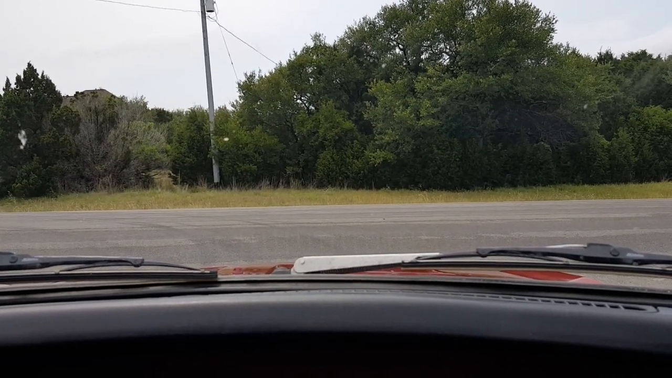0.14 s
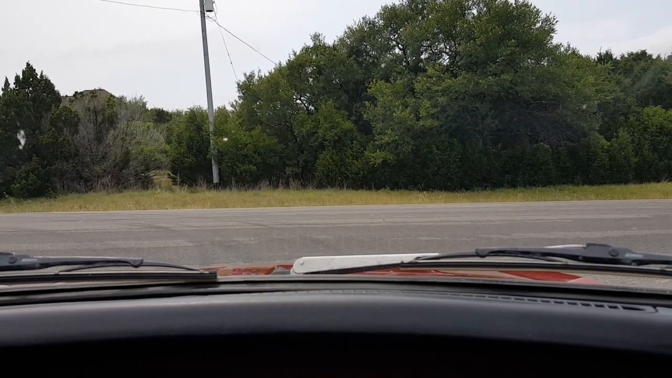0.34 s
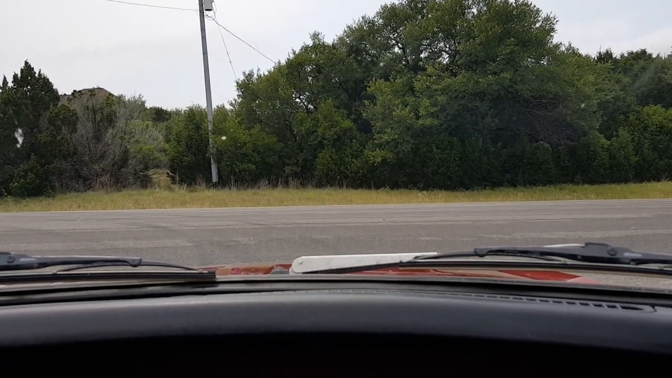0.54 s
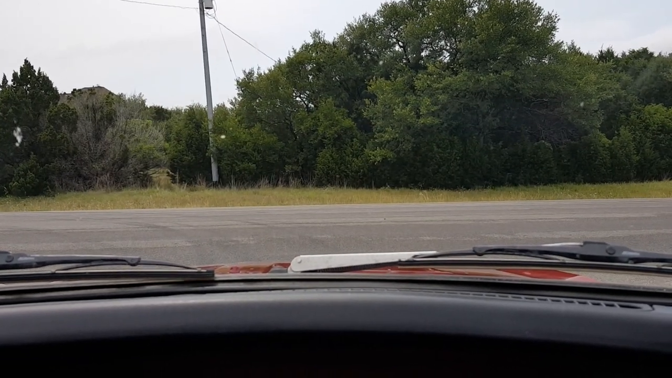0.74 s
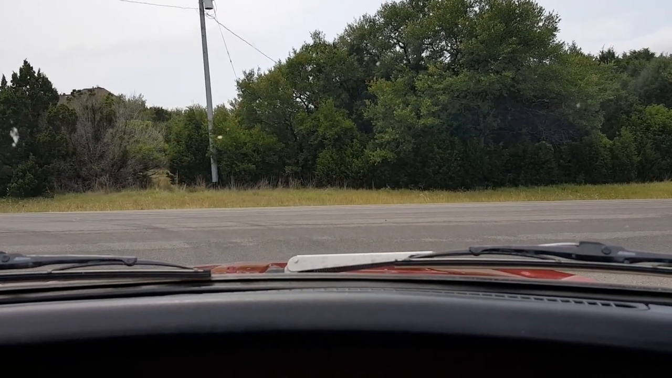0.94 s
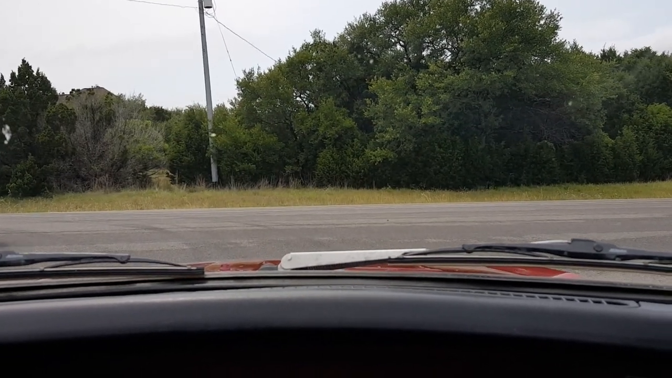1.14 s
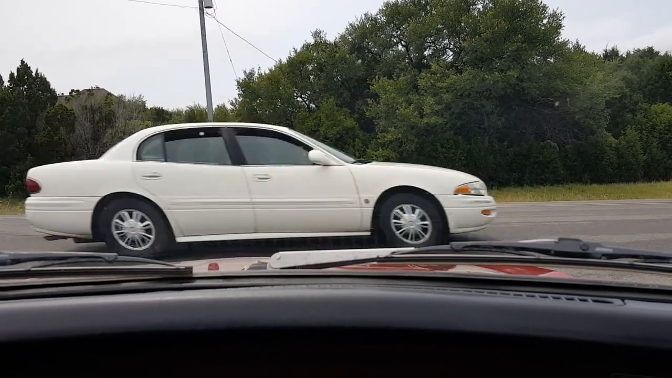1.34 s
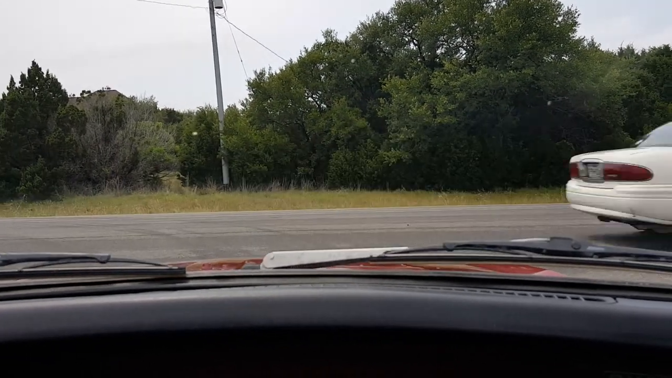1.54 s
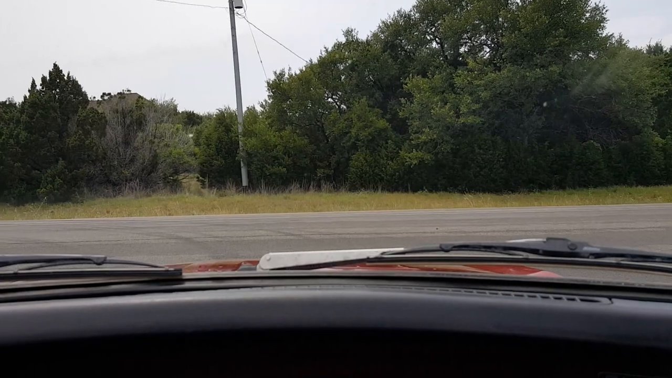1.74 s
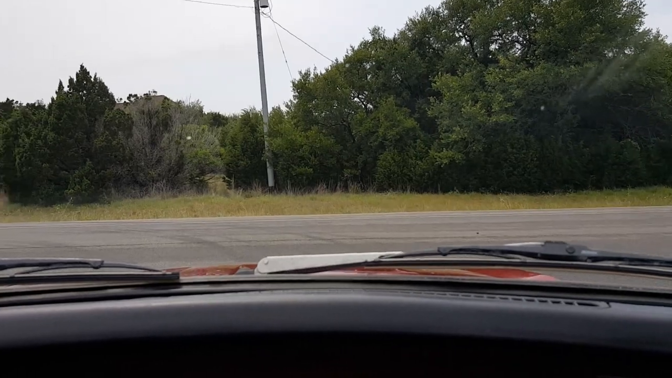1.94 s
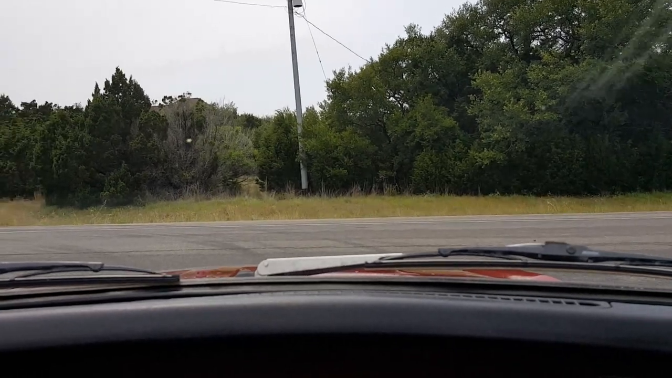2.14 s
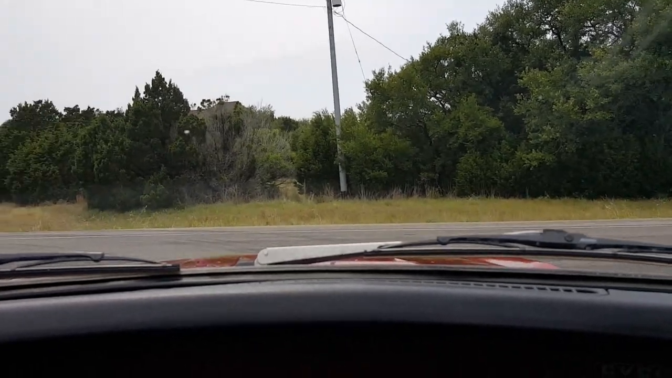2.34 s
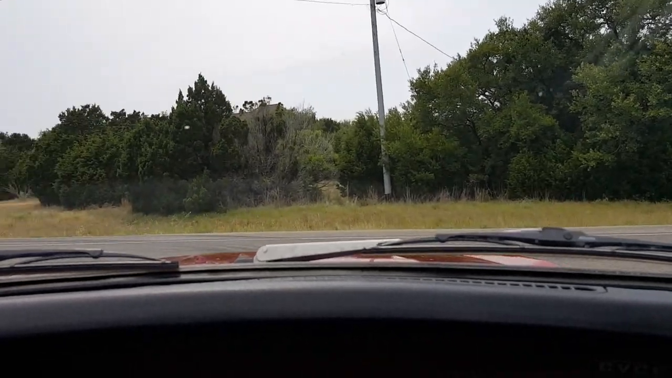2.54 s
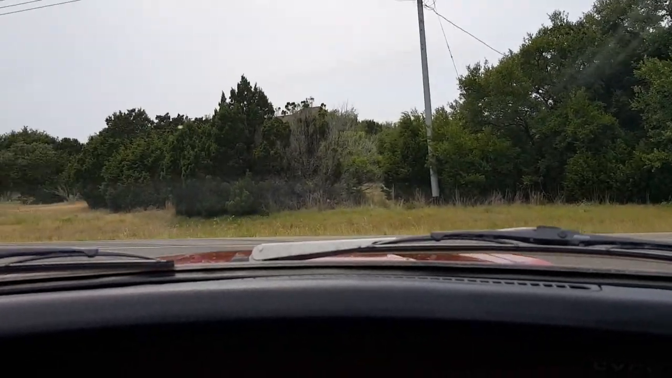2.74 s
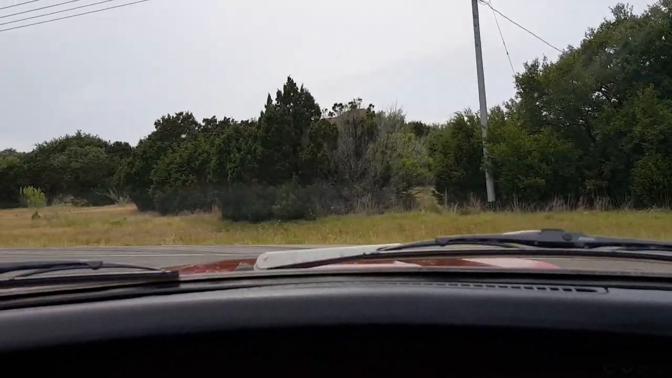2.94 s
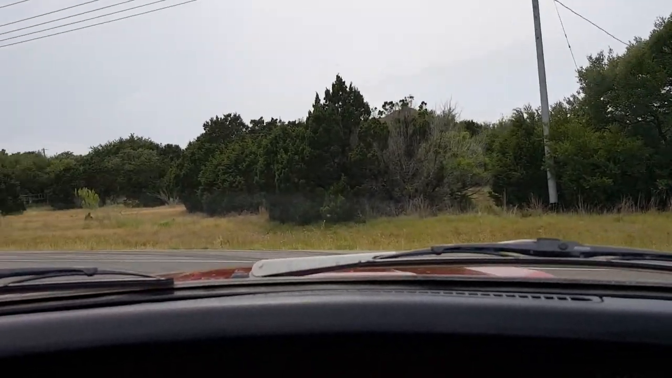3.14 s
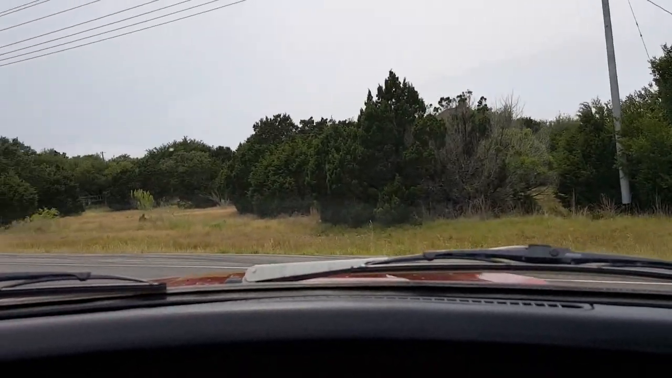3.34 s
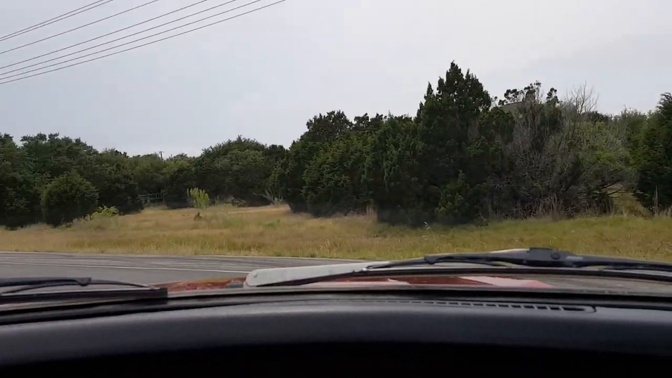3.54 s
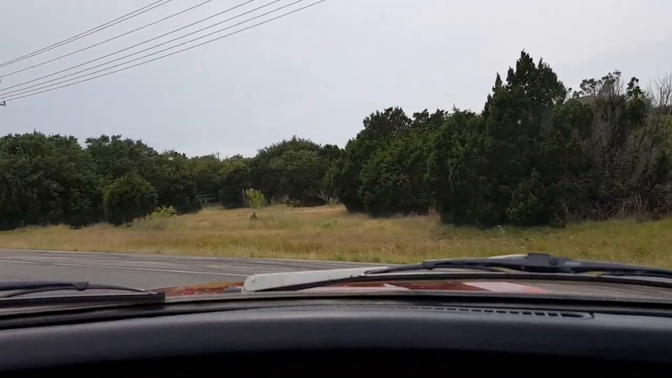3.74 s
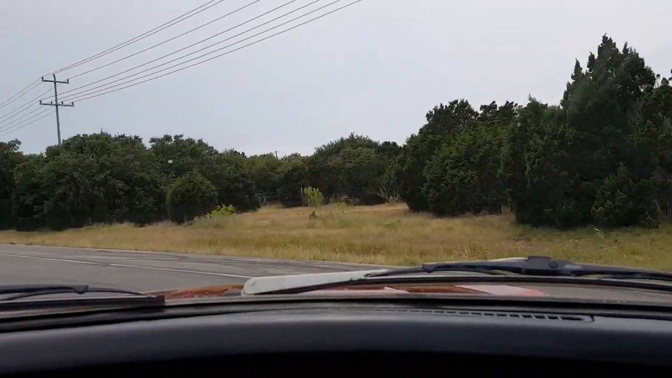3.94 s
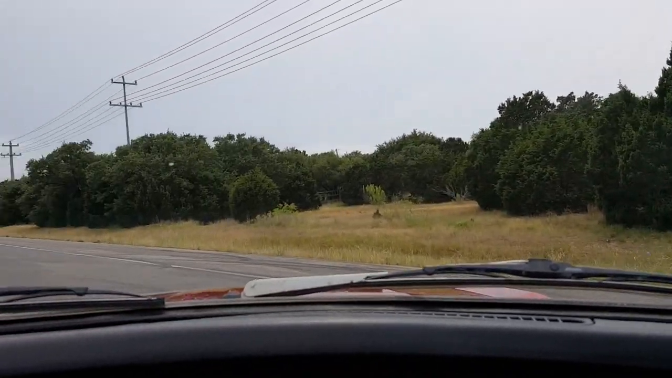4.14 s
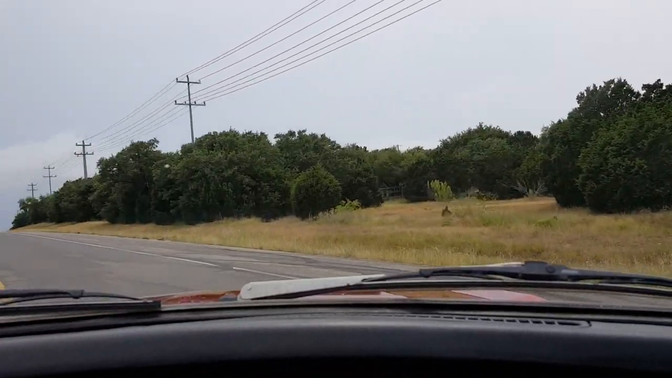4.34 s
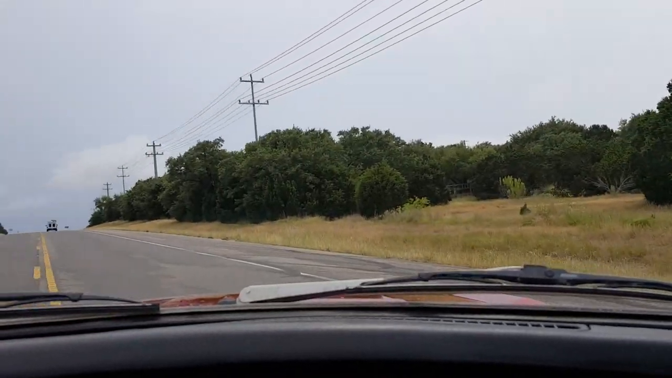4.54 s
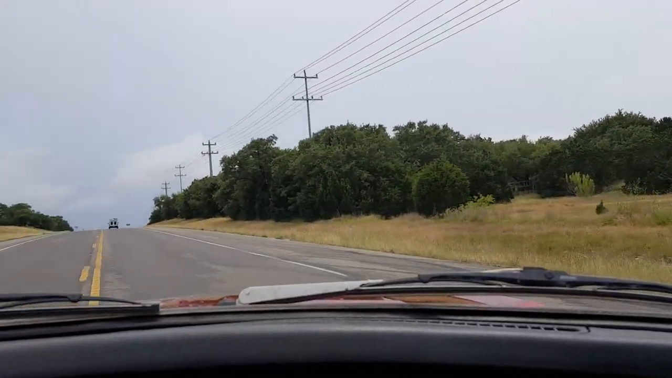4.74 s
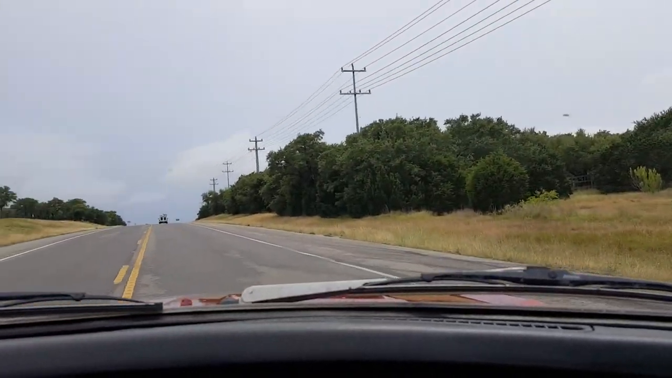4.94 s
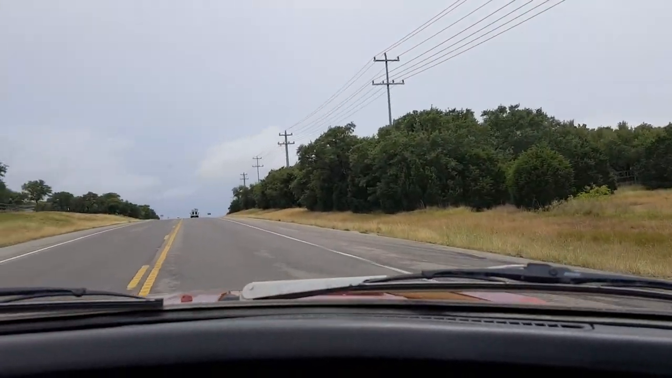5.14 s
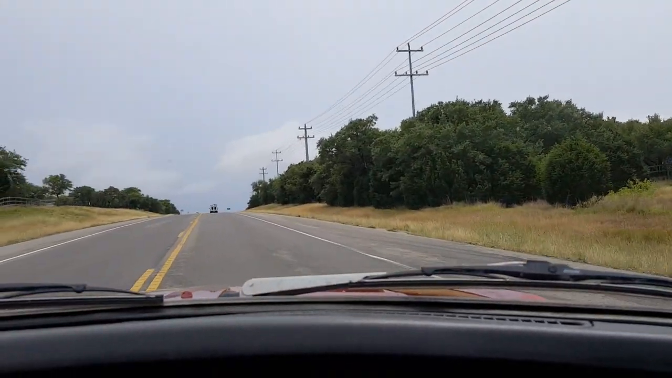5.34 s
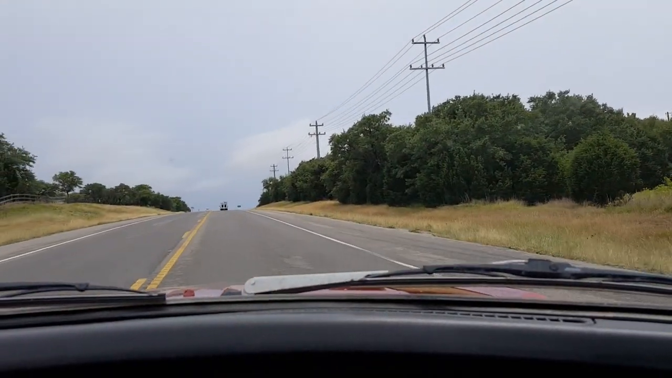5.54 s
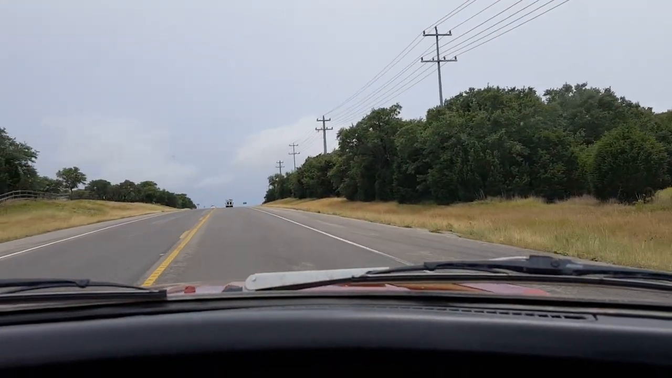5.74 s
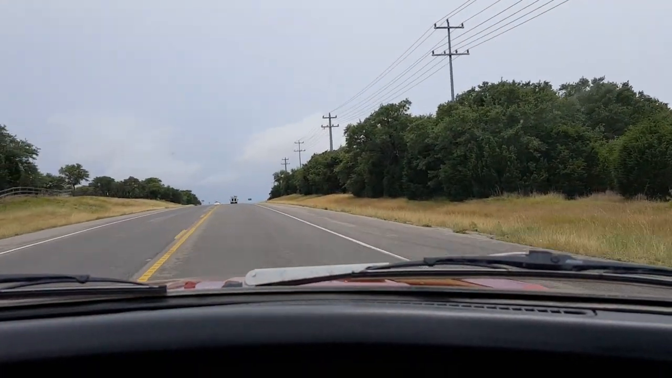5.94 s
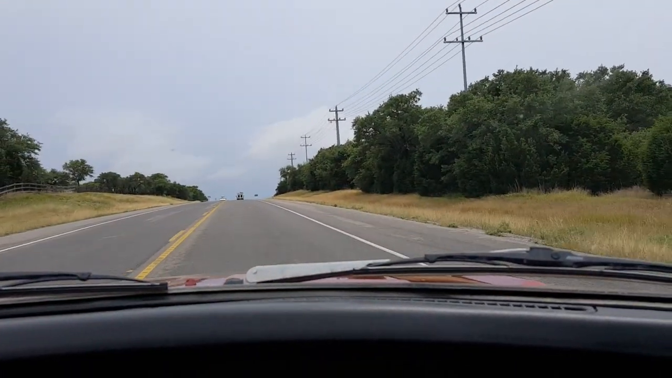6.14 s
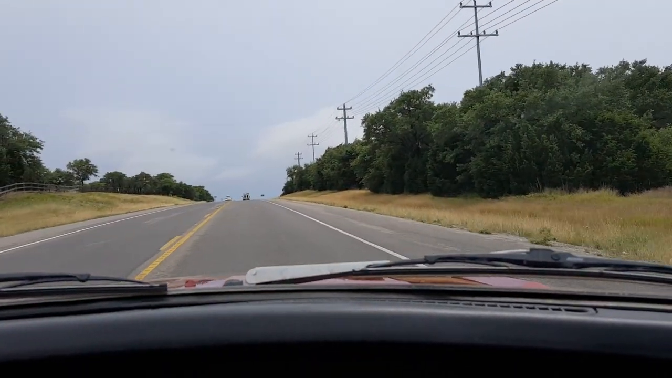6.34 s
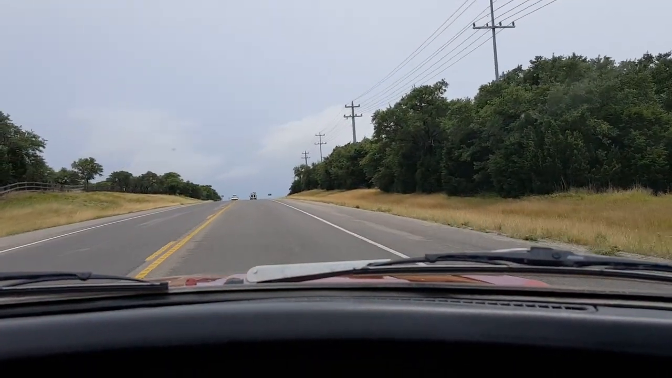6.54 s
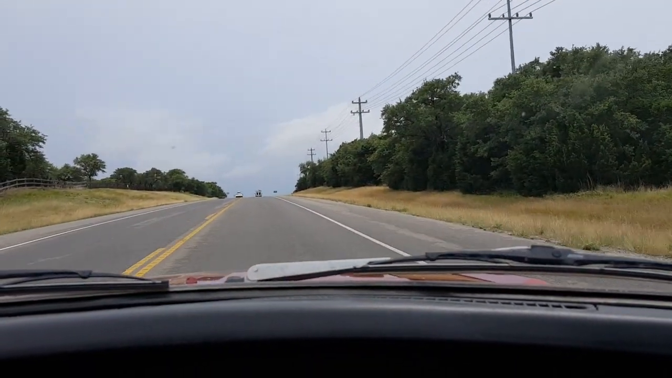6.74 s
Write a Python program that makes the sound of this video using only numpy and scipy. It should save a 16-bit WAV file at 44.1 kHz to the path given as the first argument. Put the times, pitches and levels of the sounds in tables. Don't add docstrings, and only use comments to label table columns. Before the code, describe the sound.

Inside a small car, the engine idles, revs and pulls away with a deepening boom rising in pitch, while an indicator ticks and trim creaks.

```python
import sys
import numpy as np
from scipy import signal
from scipy.io import wavfile
from scipy.ndimage import uniform_filter1d

SR = 44100
rng = np.random.default_rng(int(sys.argv[2]) if len(sys.argv) > 2 else 0)


def invert_db(level):
    return 10 ** (np.asarray(level, dtype=float) / 20)


def put_to_file(sound):
    columns = np.atleast_2d(sound).T
    safe = np.clip(columns, -1, 1)
    whole_steps = np.round(safe * 32767)
    wavfile.write(sys.argv[1], SR, whole_steps.astype(np.int16))


N = 303798
LEFT_LAG = 12


def rms_one(x):
    return x / np.sqrt(np.mean(x ** 2) + 1e-20)


def in_time(rows):
    s, *columns = np.transpose(rows)
    return [np.interp(np.arange(N) / SR, s, c) for c in columns]


def at_hz(points, hz):
    table_hz, level = np.transpose(points)
    return np.interp(np.log(hz), np.log(table_hz), level)


def humps(events):
    t = np.arange(N) / SR
    return sum(db * np.exp(-((t - s) / half) ** 4) for s, half, db in events)


def drift(rate_hz):
    r = np.exp(-80 * np.pi * rate_hz / SR)
    slow = signal.lfilter([1], [1, -2 * r, r * r], rng.standard_normal(N // 40 + 2002))[2000:]
    return np.interp(np.arange(N) / 40, np.arange(len(slow)), rms_one(slow))


def narrow(phase, width_hz):
    return drift(width_hz) * np.cos(phase) + drift(width_hz) * np.sin(phase)


def ring(clicks, hz, t60_s):
    r = invert_db(-60 / (t60_s * SR))
    w = 2 * np.pi * hz / SR
    return signal.lfilter([0, np.sin(w)], [1, -2 * r * np.cos(w), r * r], clicks + 1e-18)


def sides(db):
    return invert_db(np.array([[db / 2], [-db / 2]]))


# start_s, firing_hz, throttle_db
ENGINE = [(0.0, 25.31, -20.5), (0.69, 25.46, -18.8), (0.9, 31.3, -14.5), (1.04, 39.71, -10.5),
          (1.17, 49.08, -6), (1.32, 56.95, -4), (1.55, 61.01, -7.5), (2.2, 62.15, -10.0),
          (2.95, 64.58, -2.5), (3.47, 70.67, -2.0), (3.85, 74.18, -0.6), (4.45, 75.8, -0.0),
          (4.75, 78.11, -2.7), (5.17, 82.04, 3), (5.33, 85.6, 3.5), (5.52, 87.08, 3.5), (6.45, 91.38, 5),
          (6.89, 94.93, 7)]


def engine_run():
    firing_hz, throttle_db = in_time(ENGINE)
    turns = 2 * np.pi * np.cumsum(firing_hz) / SR
    return firing_hz, throttle_db, turns


# full_throttle_db, follow_db (gained per dB of throttle)
ORDER_LAW = [(-23, 0.6653), (-19, 1.48), (-22, 1.3), (-28, 1.17), (-32.5, 0.86), (-34, .5)]
# pitch_hz, width_hz, level_db
CABIN_MODES = [(27.0, 7, -6.5), (61.75, 2.1, 8), (70.42, 5.6, 9), (82.2, 2.34, 8), (88.15, 4.2, 3),
               (94.5, 2.1, -1.4), (124.2, 2.67, 12), (137.9, 11.3, 1.44), (223.4, 44, -15.5),
               (236.3, 9.1, -10), (299.2, 12.8, -7), (363, 1.4, -12), (437, 21, -10.5), (509, 27.7, -3.5)]


def order_levels(firing_hz, throttle_db, slack_db):
    ring_up_s, waver_size_db = .15, .5
    levels = []
    for k, (full_db, follows) in enumerate(ORDER_LAW):
        order_hz = (k + 1) * firing_hz
        lift = sum(invert_db(db) ** 2 / (1 + (2 * (order_hz - hz) / width_hz) ** 2)
                   for hz, width_hz, db in CABIN_MODES)
        lift_db = 10 * np.log10(uniform_filter1d(lift, int(ring_up_s * SR)))
        waver_db = waver_size_db * min(k, 2) * drift(5.3)
        sag_db = slack_db * min(k, 2) / 2
        levels.append(full_db + follows * throttle_db + lift_db + waver_db - sag_db)
    return levels


def firing_orders(turns, order_db):
    out = 0
    for k, db in enumerate(order_db):
        out = out - invert_db(db + .8 * drift(15)) * np.cos((k + 1) * turns + .08 * drift(5))
    return np.sqrt(2) * out


# multiple (of firing_hz), level_db
# (over the roar), start_s, end_s
SWELLS = [(3, 9, 0, 0.3), (5.5, 5.5, -1.5, 0.85), (.5, -2, 1.4, 7.2), (1.5, 1.5, .9, 7.2),
          (2.5, -1.5, 1.4, 3.1), (5, -1, 2.5, 2.95), (2.25, 15.5, 3.0, 3.56), (2.5, 6.5, 3.7, 4.45),
          (2.8, 12.5, 3.7, 4.2), (3.2, 3, 3, 3.5), (3.5, 5.5, 3.5, 4.5), (6.5, -5.5, 3.4, 4.504),
          (8, -6.5, 3, 4.1), (3.5, 5.5, 4.8, 5.3), (2.25, 8, 5.5, 6.4), (3.6, 5, 6.1, 7.2),
          (16, -10.5, 3.15, 3.6), (5.5, -4, 5.5, 6.0), (7.5, -7.5, 5.0, 5.7), (6.5, -11, 5.4, 6.6),
          (7, -10, 5.2, 7.2), (9, -6, 5.4, 7.2), (8.5, -6, 6, 7.2), (8.75, -8.5, 6.5, 7.2),
          (11.5, -12, 6, 6.5), (14.5, -6.5, 4, 5.4), (4, 4, 3, 3.75), (5, 0.5, 4.5, 5.2),
          (17, -11, 5.7, 7.2), (2, 21, 0.74, 1.14)]
# pitch_hz, width_hz, level_db (over the roar)
PANELS = [(467, 33, -13.5), (803.5, 28, -11), (1015, 8.8, -14)]


def swells(turns, roar_db):
    t, out = np.arange(N) / SR, 0
    for multiple, db, start, end in SWELLS:
        on = np.clip(np.minimum(t - start, end - t) / 0.11, 0, 1)
        phase = multiple * turns
        width_hz = 2.2 + .6 * multiple
        out = out + on * invert_db(db) * (np.cos(phase) + 0.53 * narrow(phase, width_hz))
    for hz, width_hz, db in PANELS:
        out = out + invert_db(db) * narrow(2 * np.pi * hz * t, width_hz)
    return -invert_db(roar_db) * out


GROWL_HZ = [600, 1400]


def growl(turns, roar_db):
    every_firing = 1 / (1.9025 - 1.9 * np.cos(turns))
    every_second = .25 / (1.9409 - 1.94 * np.cos(turns / 2))
    bulkhead = signal.butter(2, GROWL_HZ, "band", fs=SR, output="sos")
    through = signal.sosfilt(bulkhead, every_firing + every_second)
    return invert_db(roar_db - 13 + 1.9 * drift(3.6)) * rms_one(through)


def valves(turns, firing_hz):
    clicks = np.diff(np.floor(turns / (2 * np.pi) - .04), prepend=-1.)
    strength = invert_db(-49 + 2 * drift(20)) * (26 / firing_hz) ** .55
    return ring(clicks * strength, hz=2225, t60_s=.085)


TICKS = [.0828, .7258, 1.3375, 1.9517, 2.5726, 3.1952, 3.7994, 4.3910, 4.9941]
TOCKS = [.3831, 1.0248, 1.6363, 2.2499, 2.8720, 3.4985, 4.0976, 4.6857, 5.2945]
# pitch_hz, level_db, t60_s
TICK_MODES = [(3100, -15, .05), (5000, -9, .012), (7300, -1, .003), (9000, -6, .002), (11400, -7, .005),
              (12300, -3, .002), (14800, -10, .002)]
# pitch_hz, level_db, t60_s
TOCK_MODES = [(5200, -6, .002), (7400, -2, .003), (9200, -2, .002), (12700, -4, .003), (14800, -8, .002)]


def relay(times, level_db, modes):
    rattle, usual = np.zeros(N), rng.standard_normal(1200)
    fade = np.exp(-np.arange(1200) / 220.0)
    for s in times:
        i = round(s * SR)
        rattle[i:i + 1200] = (usual + 0.48 * rng.standard_normal(1200)) * fade
    return sum(invert_db(level_db + db) * ring(rattle, hz, t60) for hz, db, t60 in modes)


def indicator():
    return relay(TICKS, -62.5, TICK_MODES) + relay(TOCKS, -62, TOCK_MODES)


# start_s, level_db (peak),
# pitch_hz, t60_s
PINGS = [(.098, -56, 3030, .15), (.0505, -45, 1560, .1), (.0505, -47, 2050, .1), (1.22, -32, 1260, 0.081),
         (1.36, -36, 1680, .05), (1.255, -26, 210, 0.24), (1.69, -57.5, 5300, .15), (.139, -25, 113, .09),
         (.284, -31, 100, .12)]


def pings():
    return sum(ring(invert_db(db) * (np.arange(N) == round(s * SR)), hz, t60) for s, db, hz, t60 in PINGS)


def cabin(x):
    out = np.array([np.roll(x, LEFT_LAG), x]) * sides(2.5)
    delays = (rng.uniform(0.00068, 0.0066, 8) * SR).astype(int)
    for k, delay in enumerate(delays):
        out[k % 2, delay:] += invert_db(-9) * (-1) ** (k // 2) * x[:-delay]
    return out


def snaps(events, spread):
    out, t = np.zeros((2, N)), np.arange(6000) / SR
    for s, db, hz, t60, pan_db in events:
        band = signal.butter(2, [hz / spread, min(hz * spread, .45 * SR)], "band", fs=SR, output="sos")
        shared, left, right = rng.standard_normal((3, len(t)))
        burst = rms_one(signal.sosfilt(band, shared + np.array([left, right])))
        i = round(s * SR)
        out[:, i:i + len(t)] += invert_db(db - 7.0 - 60 * t / t60) * burst * sides(pan_db)
    return out


# start_s, level_db (peak), pitch_hz (centre), t60_s, left_minus_right_db
CRACK = [
    (1.2462, -19.5, 1600, 0.04, 6),
    (1.2495, -19.5, 1020, 0.11, -0.5),
    (1.2462, -30, 3300, 0.064, -2),
    (1.2465, -34, 5900, 0.12, 1.5),
    (1.259, -32, 1600, 0.12, 7.5),
    (.0505, -37.5, 1350, 0.087, 4),
    (.0505, -53, 4200, .08, 3),
    (.102, -54.5, 3400, 0.073, 1),
]
STALK = [
    (5.484, -45, 8300, 0.087, 6.5),
    (5.501, -36.5, 2009, .05, 7),
    (5.501, -58.5, 9100, 0.036, 5.5),
]
KNOCKS = [(0.1364, -46, 800, 0.06, 3.0), (1.1252, -36, 1880, 0.075, 3.0), (1.247, -28, 600, 0.077, 2),
          (2.2258, -32.5, 1249, 0.07, 4.0), (2.4085, -41.5, 1019, 0.049, 4.5),
          (2.804, -32, 1070, 0.06, 4.5), (2.948, -42, 1150, 0.06, 5.5), (3.8736, -48, 1120, 0.06, 3.1),
          (5.4789, -40.5, 1030, 0.06, 2.7)]
SNAPS = [(0.2379, -60, 5110, 0.052, 7.5), (0.2882, -57.5, 5380, 0.06, 4.5), (0.9807, -55, 7350, 0.06, 6),
         (1.057, -45, 5970, 0.039, -3.5), (1.081, -41, 5400, 0.06, 1.5), (1.1242, -36.5, 5510, 0.042, 1.5),
         (1.1677, -44.5, 5470, 0.035, 0), (1.6107, -53.5, 5380, 0.055, 6.5),
         (2.0371, -49, 5140, 0.06, -0.5), (2.0642, -52, 5450, 0.047, -1), (2.086, -50.5, 5130, 0.06, 8),
         (2.2256, -57.5, 5334, 0.06, -1), (3.2849, -51.5, 4950, 0.053, 5), (4.8143, -52, 6280, 0.051, 2),
         (5.1841, -46, 5480, 0.076, 0.5), (3.905, -52, 4710, .05, 2), (6.097, -48, 5400, .05, 3),
         (6.482, -46.5, 5380, .05, 2), (6.7114, -45, 5400, 0.046, 4)]
HIGH_SNAPS = [(2.0009, -56, 12750, 0.043, 4.0), (2.338, -61, 12560, 0.05, 4.5),
              (2.3665, -57.5, 14300, 0.057, 5.1), (2.379, -49.5, 14250, 0.04, 4.5),
              (2.4946, -59.5, 12600, 0.05, 4.0), (2.6317, -64, 14080, 0.056, 2.5)]


def trim():
    out = snaps(CRACK, spread=1.5) + snaps(STALK, spread=1.5) + snaps(KNOCKS, spread=1.48)
    return out + snaps(SNAPS, spread=1.39) + snaps(HIGH_SNAPS, spread=1.06)


# pitch_hz, likeness (0 to 1)
LIKENESS = [(60, 0.94), (180, 0.92), (300, 0.63), (520, 0.11), (1000, .5), (2000, 0.24), (4000, 0.15),
            (12000, 0.19)]
# pitch_hz, left_minus_right_db
LEFT_UP = [(60, 0), (250, 2), (500, 1.5), (1000, 5.5), (2000, 4), (4000, -1), (8000, 3.5), (12000, 2)]


def banded_noise(spectrum, patchy_db, lag=LEFT_LAG):
    out, together = 0, drift(8)
    low_end, high_end = spectrum[0][0], spectrum[-1][0]
    edges = low_end * 2 ** np.arange(0, np.log2(high_end / low_end) + .01, 1 / 3)
    white = rng.standard_normal((2, 2, N))
    for k, (low, high) in enumerate(zip(edges, edges[1:])):
        band = signal.butter(2, [low, high], "band", fs=SR, output="sos")
        mid, side = signal.sosfilt(band, white[k % 2])
        hz = np.sqrt(low * high)
        alike = np.clip(at_hz(LIKENESS, hz), 0, 1)
        level_db = at_hz(spectrum, hz) + patchy_db * (together + drift(21))
        stereo = np.sqrt(1 + alike) * mid + np.sqrt(1 - alike) * side * [[1], [-1]]
        out = out + invert_db(level_db) * sides(at_hz(LEFT_UP, hz)) * stereo
    out[0] = np.roll(out[0], lag)
    return rms_one(out)


# pitch_hz, level_db (per Hz)
RUMBLE = [(25, -17.5), (40, -6), (65, -0.5), (110, -4), (150, 1), (220, -10.5), (320, -12.5), (420, -38.5)]
# start_s (centre),
# half_s, level_db (gained, negative for a dip)
BUMPS = [(.02, 0.022, 3.5), (.2, .08, 4), (.36, 0.029, -9), (.82, 0.07, -5), (1.1, 0.29, 2),
         (2.4, .04, -1.5), (2.97, 0.068, 3), (4.3, .04, 4), (4.97, .06, 3), (5.28, 0.043, -3),
         (5.55, 0.042, 7), (5.87, 0.095, 6), (6.33, 0.09, 2)]


def rumble(roar_db, slack_db):
    level_db = roar_db + 12 + humps(BUMPS) - 0.19 * slack_db
    return invert_db(level_db) * banded_noise(RUMBLE, patchy_db=1.18, lag=0)


# pitch_hz, level_db (per Hz)
ROAR = [(190, -29.5), (330, -1.5), (371, -4), (443, -1.5), (612, -10.5), (807, -5.5), (915, -17.5),
        (1000, -14), (1340, -17), (2180, -20.5), (2800, -35.5), (3640, -58), (6160, -120)]


def roar(roar_db):
    return invert_db(roar_db + 3.0) * banded_noise(ROAR, patchy_db=0.22)


# pitch_hz, level_db (per Hz)
HISS = [(2300, -2), (2900, -0.5), (3600, -7.5), (4500, -6), (5600, -14.5), (7000, -15.5), (9000, -15),
        (10200, -33), (12000, -21), (16000, -28)]
# start_s (centre), half_s, level_db (gained)
PASSING = [
    (1.55, .6, 2),
]


def hiss(roar_db):
    level_db = -60.5 + 0.96 * (roar_db + 42) + humps(PASSING)
    return invert_db(level_db + 1.33) * banded_noise(HISS, patchy_db=0.95)


# pitch_hz, level_db (per Hz)
SELF_NOISE = [(3000, -1), (4000, -4.5), (6300, -3), (9000, -5.5), (10200, -7), (11500, -5), (16000, -4)]


def self_noise():
    return invert_db(-77) * banded_noise(SELF_NOISE, patchy_db=0.0)


# start_s, level_db
ROAD = [(0, -49.5), (.2, -52.5), (.7, -51.5), (1.0, -46.5), (1.25, -42), (2.9, -43), (3.6, -41), (4.9, -39),
        (6.89, -36)]
# start_s (centre), half_s, level_db (lost)
SLACKS = [(3.69, 0.031, 12.5), (4.55, 0.032, 8), (4.72, 0.035, 3.5), (5.35, 0.15, 6.5)]


def scene():
    firing_hz, throttle_db, turns = engine_run()
    roar_db, = in_time(ROAD)
    slack_db = humps(SLACKS)
    order_db = order_levels(firing_hz, throttle_db, slack_db)
    boom = firing_orders(turns, order_db) * sides(1.9)
    tones = swells(turns, roar_db) + growl(turns, roar_db) + valves(turns, firing_hz)
    boom += np.array([np.roll(tones, LEFT_LAG), tones]) * sides(3.8)
    parts = cabin(indicator() + pings())
    road = rumble(roar_db, slack_db) + roar(roar_db) + hiss(roar_db)
    return boom + parts + trim() + road + self_noise()


def roll_off(x):
    return signal.sosfilt(signal.butter(12, 15830, fs=SR, output="sos"), x)


def record(dry):
    return roll_off(dry)


dry = scene()
out = record(dry)
put_to_file(out)
```